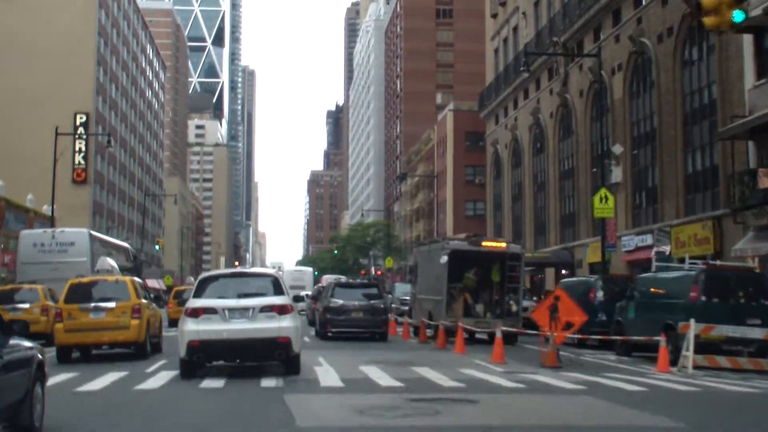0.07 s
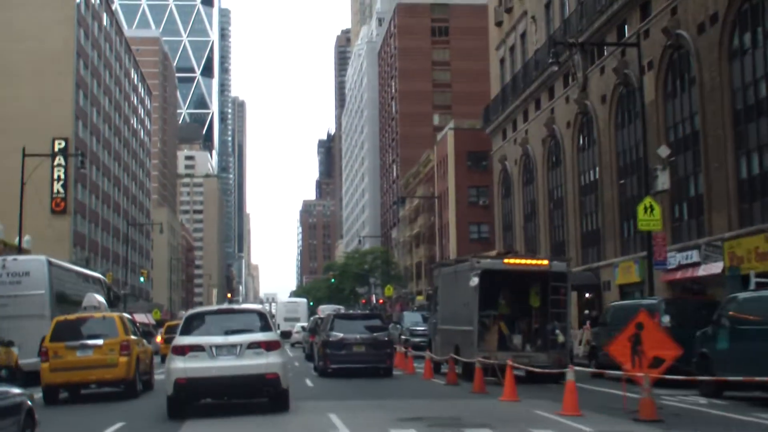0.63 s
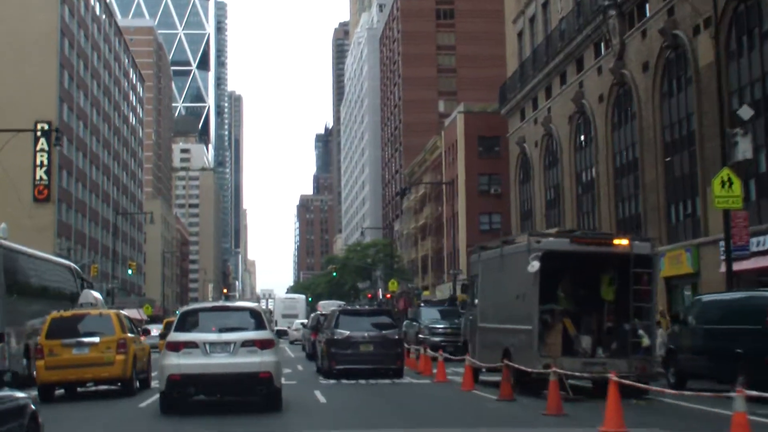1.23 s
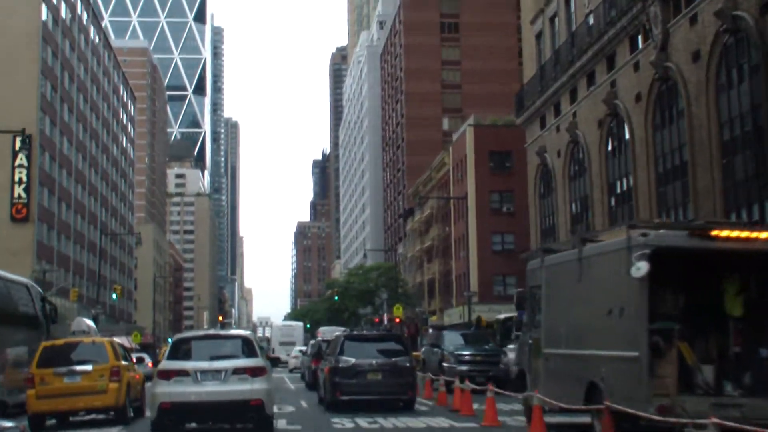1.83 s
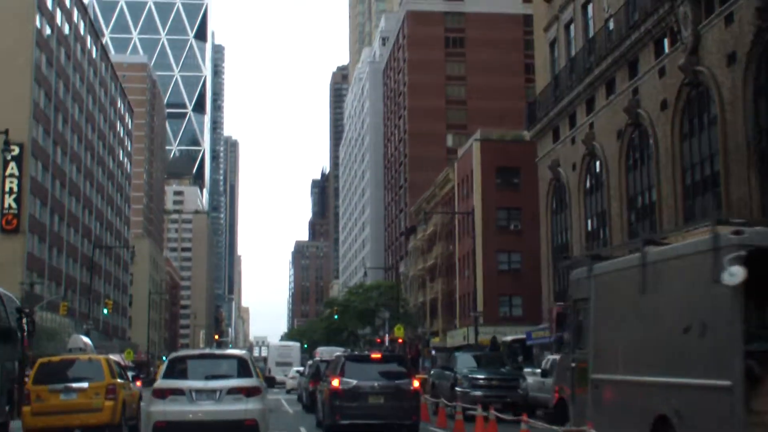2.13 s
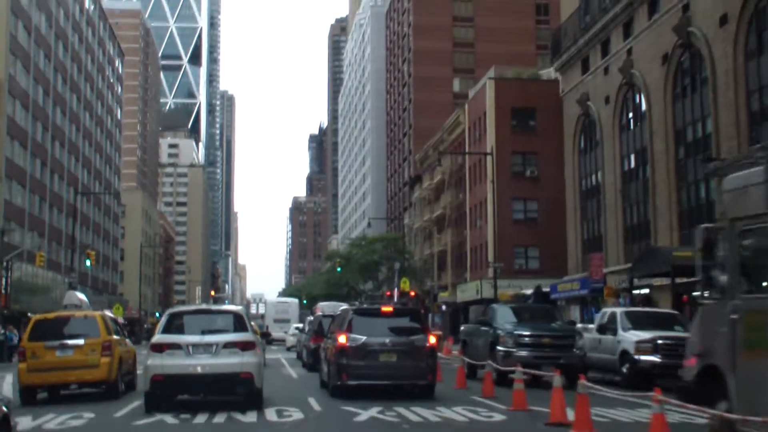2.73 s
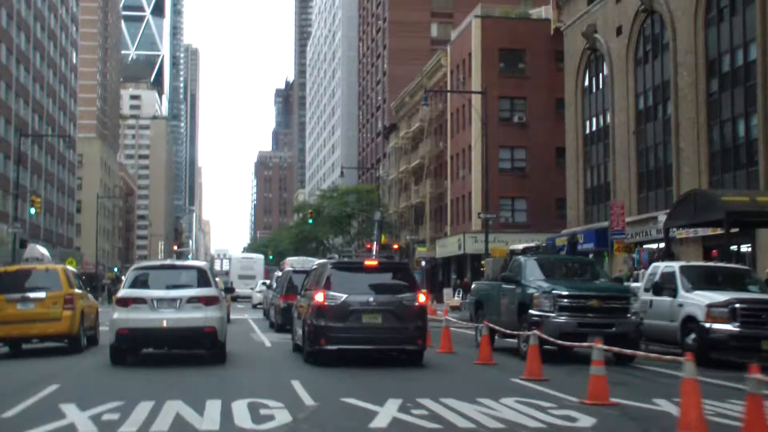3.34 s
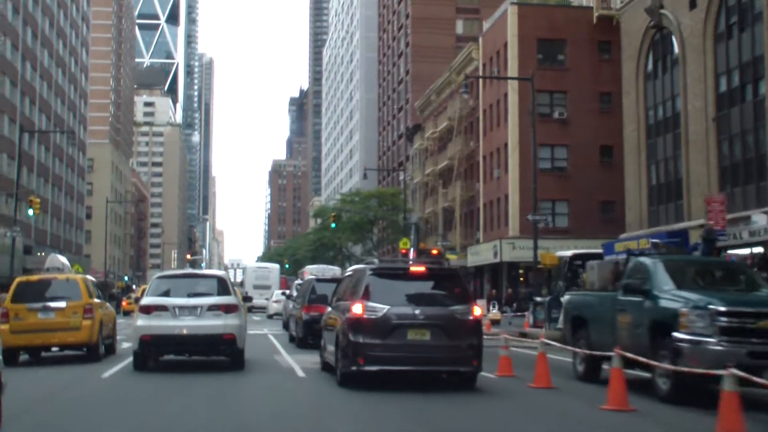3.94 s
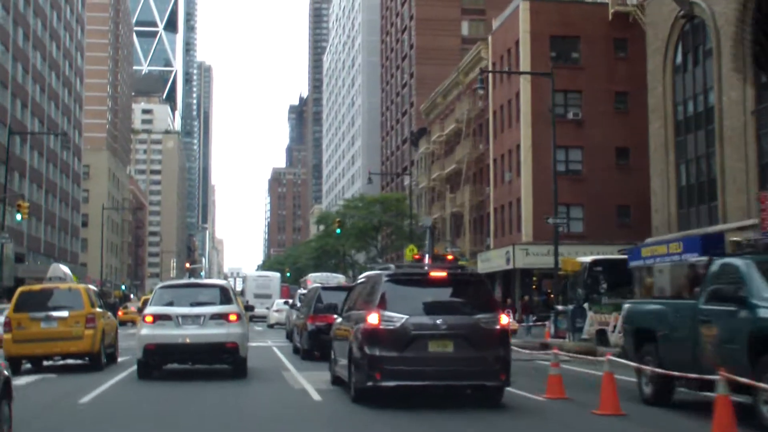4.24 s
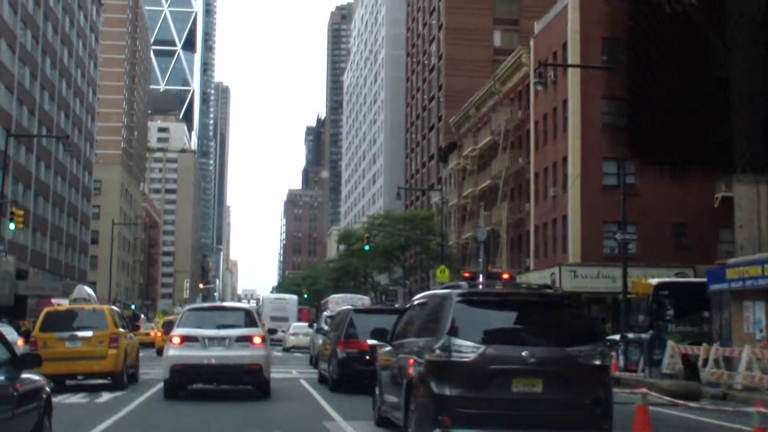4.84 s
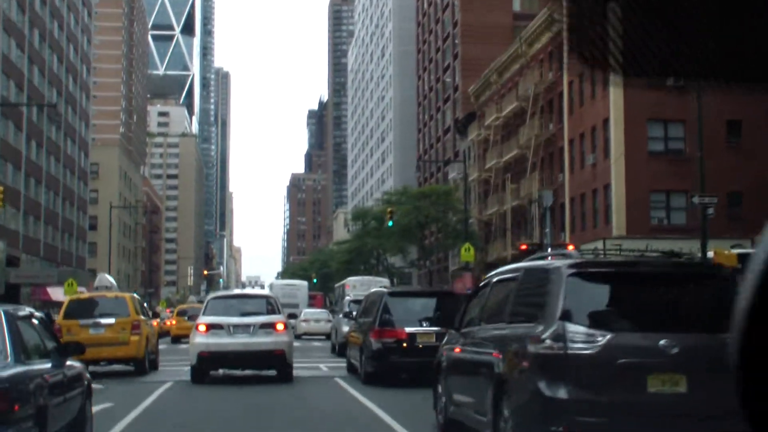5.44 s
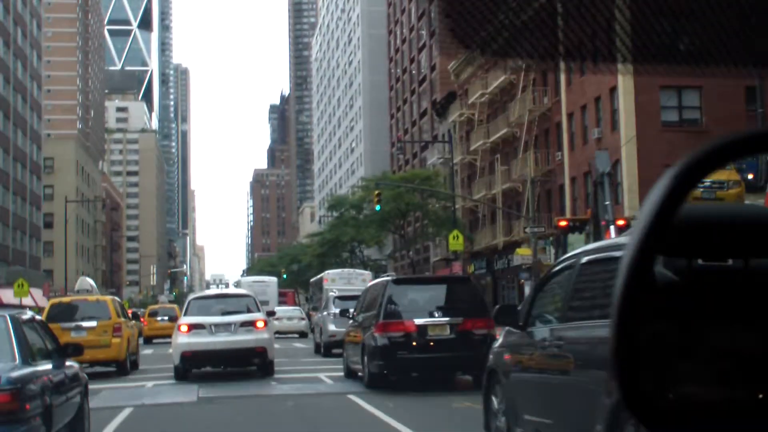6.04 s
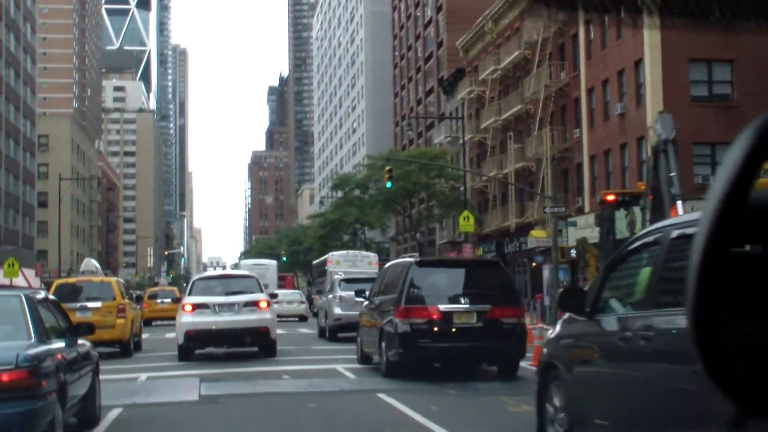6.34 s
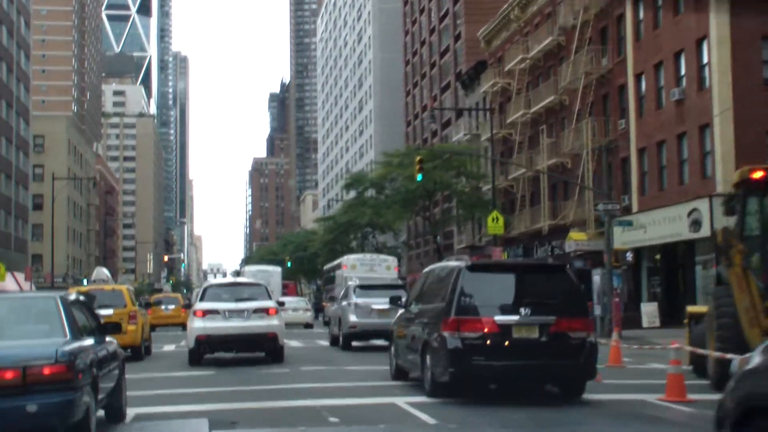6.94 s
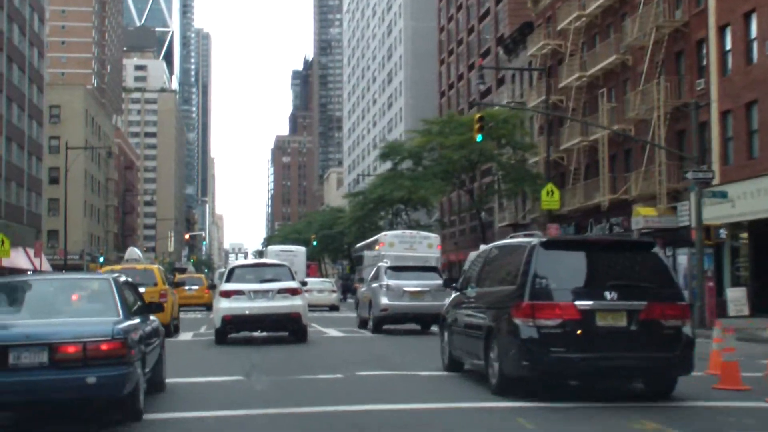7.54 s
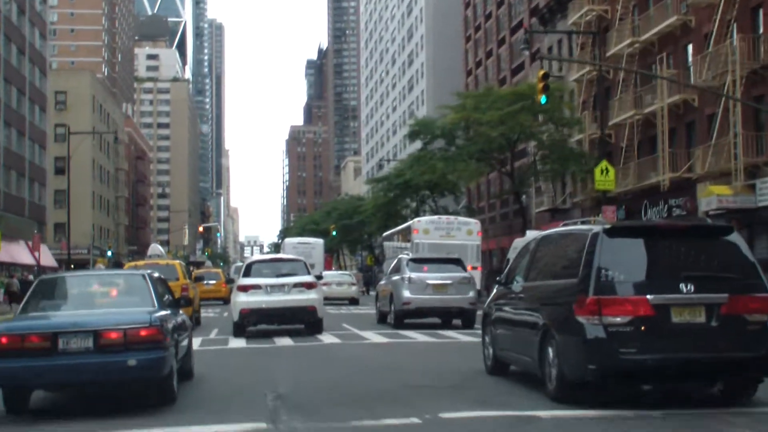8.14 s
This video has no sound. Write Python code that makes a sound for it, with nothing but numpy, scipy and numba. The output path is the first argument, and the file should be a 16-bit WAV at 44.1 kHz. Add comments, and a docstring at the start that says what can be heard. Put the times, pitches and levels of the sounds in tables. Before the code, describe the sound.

Heard from a microphone in the cabin, a car drives slowly down a city street with a heavy, surging low rumble and tyre noise. Several dull bumps and small trim clicks come in the first few seconds. Then the turn signal stalk is flicked with a quick cluster of snaps, and an even tick-tock continues over the rumble, with one brief squeak and a last double thud from the road.

```python
"""Inside a car rolling slowly along a city avenue. The body booms on its springs, the tyres roar,
trim ticks and squeaks, and road seams thud through the suspension. A hand brushes the steering
wheel and snaps the indicator stalk over; the flasher relay then goes tick-tock.
The camera's limiter rides the heavy bass, and the tallest peaks clip."""
import sys
import numpy as np
from scipy import signal
from scipy.fft import rfft, irfft, next_fast_len
from scipy.io import wavfile
from scipy.ndimage import uniform_filter1d, map_coordinates
from numba import njit

SR = 44100
rng = np.random.default_rng(int(sys.argv[2]) if len(sys.argv) > 2 else 0)


def inscribe(sig):
    """Save sig as 16-bit PCM at rate SR to the path in sys.argv[1].

    A 1-D sig is mono; a 2-D sig holds one channel per row.
    Samples are clipped to [-1, 1] before scaling.
    """
    pcm = np.round(np.clip(np.atleast_2d(sig).T, -1, 1) * 32767)
    wavfile.write(sys.argv[1], SR, pcm.astype(np.int16))


N = 360738
BLOW_S = np.arange(SR // 3) / SR  # time axis of one blow

# Level curves. Each row: time in seconds, level in dB.
BOOM_LEVEL = [(0, -11), (3.2, -10.5), (3.65, -18.5), (8.18, -15.5)]  # between surges
ROAD_ROUGHNESS = [(0.0, -25.5), (0.34, -22.5), (0.52, -23), (0.73, -19.5), (0.93, -20.5), (1.21, -29),
                  (1.59, -27.5), (2.05, -34), (2.62, -31), (3.8, -25.5), (4.31, -26), (5.01, -24.5),
                  (5.69, -25.5), (6.61, -26.5), (7.22, -24), (8.18, -25.5)]  # how hard the asphalt drives the tyres
AIR_HISS_LEVEL = [(0, -47.5), (.45, -51.5), (1.05, -49), (1.9, -53), (2.9, -53.5), (3.45, -48), (3.8, -51),
                  (5, -47.5), (8.18, -46)]

# Swells. Each row: start in seconds, length in seconds, level in dB.
BOOM_SURGES = [(0.04, .29, -2), (1.08, 0.053, -3), (1.56, .25, -6.5), (2.05, 0.12, 0), (2.37, .06, 1),
               (2.5, .36, -4), (3.06, .14, -5), (3.46, 0.055, -5), (4.0, 0.707, -8.5), (5.14, 0.1, -9),
               (5.71, .13, -8), (6.28, 0.22, -8.5), (6.74, 0.089, -8), (7.79, 0.077, -7.5),
               (8.11, 0.11, -4.5)]
FLOOR_JOLTS = [(1.07, 0.055, -9), (1.42, 0.062, -7), (1.745, 0.058, -7), (1.99, 0.058, -12.5),
               (2.62, 0.055, -8), (2.99, 0.049, -11), (3.63, 0.074, -8), (3.82, .2, -14), (7.82, .12, -8)]  # wheels crossing patches
COARSE_ASPHALT = [(0.49, 0.534, -35.5)]
HAND_STROKES = [(4.655, 0.067, -36.5), (4.82, 0.16, -43.5), (5.15, .2, -45)]

# Noise spectra. Each row: frequency in Hz, relative density in dB.
BOOM_SPECTRUM = [(12, -42), (22, -7.5), (31, -11.5), (39.5, 3.5), (43, -3.5), (50, -11), (62, -20),
                 (100, -83.5)]
RUMBLE_SPECTRUM = [(40, -96), (56, -4), (74, 5.5), (88, -4.5), (100, -4.5), (115, -1.5), (130, -5),
                   (150, -3.5), (175, -10), (260, -63.5)]
DRONE_SPECTRUM = [(110, -72), (170, 0), (200, 0.5), (235, -2), (280, -1.5), (340, -3.5), (400, -14),
                  (470, -17.5), (800, -59.5)]
ROAR_SPECTRUM = [(280, -37), (420, -2.5), (560, 3.5), (700, -2.5), (900, -3), (1100, -7.5), (1450, -12),
                 (2000, -20.5), (3200, -38.5), (8000, -64)]
HISS_SPECTRUM = [(1000, -29), (2100, 2), (3100, 5), (4200, 2.5), (5300, -0.5), (6500, -4.5), (9000, -5),
                 (15000, -15)]
THUD_SPECTRUM = [(60, -36), (180, -3.5), (400, 5), (700, -4), (1000, -15.5), (1500, -20), (2500, -35),
                 (8000, -59)]
HAND_SPECTRUM = [(1500, -2), (4000, -6), (8200, -3.5), (11000, -6), (15000, -20)]
SNAP_SPECTRUM = [(500, -0.5), (1400, -4), (2900, -6), (4200, -6), (6000, -9.5), (8300, -8.5),
                 (11000, -16.5), (15000, -20)]
RELAY_SPECTRUM = [(1500, -7.5), (2400, -5.5), (3700, -1), (6000, -2), (7000, -7.5), (8000, -8), (9000, -14),
                  (12000, -12.5), (15000, -22)]

# Loose trim. Each row: start in seconds, level in dB, centre in Hz, T60 in seconds.
TRIM_TICKS = [(.845, -34, 11000, 0.044), (0.846, -34.5, 4940, 0.052), (1.169, -29.5, 1460, 0.045),
              (1.317, -29.5, 3400, 0.045), (1.314, -24, 8460, .03), (1.543, -32, 8000, .03),
              (2.185, -32, 6900, 0.024), (3.291, -35, 6700, 0.07), (3.344, -36, 9500, 0.028),
              (3.431, -30, 8700, 0.018), (3.562, -39, 7500, .03), (4.054, -39, 9000, 0.018),
              (4.648, -30, 12000, .05), (4.661, -36, 7500, 0.024), (6.923, -32.5, 3370, 0.032),
              (7.932, -47, 6500, .02)]
# Wheels over seams. Each row: start in seconds, level in dB, T60 in seconds.
SEAM_THUDS = [(1.465, -20.5, 0.17), (1.713, -14, 0.12), (2.03, -23, 0.23), (2.646, -14, 0.11),
              (7.965, -15.5, 0.28), (8.006, -16, 0.25)]
# Trim rubbing. Each row: start in seconds, length in seconds, level in dB, pitch in Hz.
TRIM_SQUEAKS = [(1.6, 0.16, -54, 2611), (1.6, 0.16, -60, 3575), (6.144, 0.029, -30.5, 1167)]
# Stalk contacts. Each row: start in seconds, snap level in dB, relative knock level in dB.
STALK_CONTACTS = [(4.682, -22, -48), (4.942, -22, -3), (4.961, -14, -24), (4.971, -14, -13),
                  (4.987, -12, -5), (4.995, -19, -7.5)]
# Relay pulling in. Each row: start in seconds, relative level in dB, low note level in dB.
RELAY_TICKS = [(5.145, -21.5, -11), (5.825, -18.5, -9.5), (6.503, -19, -9.5), (7.184, -18, -10.5),
               (7.863, -23, -14)]
# Relay letting go. Each row: start in seconds, relative level in dB.
RELAY_TOCKS = [(5.429, -23.5), (6.106, -22.5), (6.787, -24.5), (7.480, -22), (8.148, -22)]

# Modes. Each row: frequency in Hz, relative level in dB, T60 in seconds.
PANEL_MODES = [(890, -1, 0.11), (929, -1, 0.11), (1104, -12, 0.095)]
COLUMN_MODES = [(477, -3.5, 0.041), (667, 4, 0.034), (1246, -16.5, 0.046), (1442, -20, 0.074),
                (1790, -27, 0.057), (2060, -27, 0.057), (2910, -22, 0.049)]  # steering column's plastic shell
PULL_IN_MODES = [(2650, 1, 0.027), (2935, -21.5, 0.068), (3390, -12, .05), (3830, -13, 0.048),
                 (4850, -16.5, 0.035), (5410, -16, 0.036), (6020, -23, 0.067), (6680, -19, 0.037),
                 (12950, -26, .03)]
LET_GO_MODES = [(2790, -11.5, 0.053), (3464, -5.5, 0.036), (3920, 2, 0.032), (4840, -14, 0.034),
                (5960, -11.5, .06), (7650, 1, 0.021), (8150, -6.5, 0.026), (11300, -18, .05)]

# Cabin reflections. Each row: frequency in Hz, T60 in seconds.
CABIN_DECAY = [(200, 0.09), (3000, 0.09), (12000, 0.064)]
# Stereo likeness. Each row: frequency in Hz, left-right correlation.
CORRELATION = [(60, .995), (300, .985), (640, .96), (1400, .88), (3100, .62), (6800, .33), (15000, .15)]
# Stereo balance. Each row: frequency in Hz, left minus right in dB.
BALANCE = [(100, 2.8), (200, 1.5), (400, .4), (1500, -.3), (5000, 1.2)]
# Camera's presence lift and dull top. Each row: frequency in Hz, gain in dB.
CAMERA_EQ = [(2000, 0.5), (4200, 1), (8000, -2.5), (14000, -3)]


def amp(db):
    """Decibels to gain."""
    return 10 ** (np.asarray(db) / 20)


def unit_rms(x):
    """Scale to rms 1."""
    return x / np.sqrt(np.mean(x ** 2) + 1e-20)


def at_hz(rows, hz):
    """Interpolate (Hz, value) rows on a log axis."""
    knots_hz, values = np.transpose(rows)
    return np.interp(np.log(hz + 1), np.log(knots_hz + 1), values)


def curve(rows):
    """Interpolate (seconds, value) rows at every sample."""
    return np.interp(np.arange(N) / SR, *np.transpose(rows))


def filtered(x, response):
    """Apply a gain given as a function of Hz."""
    n = x.shape[-1]
    padded = next_fast_len(n + 8192)
    return irfft(rfft(x, padded) * response(np.fft.rfftfreq(padded, 1 / SR)), padded)[..., :n]


def noise(spectrum, size=N):
    """Coloured stereo noise, rms 1: alike in the bass, diffuse in the treble."""
    def mid_side_gain(hz):
        angle = np.arccos(np.clip(at_hz(CORRELATION, hz), -1, 1)) / 2
        return amp(at_hz(spectrum, hz)) * np.array([np.cos(angle), np.sin(angle)])
    mid, side = filtered(rng.standard_normal((2, size)), mid_side_gain)
    return unit_rms(np.array([mid + side, mid - side]))


def steady_noise(spectrum, span_s):
    """Noise whose strength is evened out over stretches longer than span_s."""
    x = noise(spectrum)
    power = uniform_filter1d(np.mean(x ** 2, axis=0), int(span_s * SR))
    return unit_rms(x / np.sqrt(np.abs(power) + 1e-6))


def wobble(knots_per_s):
    """Smooth random curve."""
    knots = rng.standard_normal(int(N * knots_per_s / SR) + 4)
    return map_coordinates(knots, [np.arange(N) * knots_per_s / SR])


def swells(rows, rise_s, t60_s):
    """Gain of events that rise, hold and die away, summed in power."""
    t, power = np.arange(N) / SR, np.zeros(N)
    for start_s, length_s, db in rows:
        first = np.searchsorted(t, start_s)
        age_s = t[first:] - start_s
        rise = 1 - np.exp(-age_s / rise_s)
        fall_db = 60 * np.maximum(age_s - length_s, 0) / t60_s
        power[first:] += (rise * amp(db - fall_db)) ** 2
    return np.sqrt(power)


def envelope(t60_s, rise_s):
    """Rise and decay of one blow."""
    return amp(-60 * BLOW_S / t60_s) * (1 - np.exp(-BLOW_S / rise_s))


def burst(spectrum, t60_s, rise_s):
    """Decaying noise of one blow."""
    return envelope(t60_s, rise_s) * noise(spectrum, len(BLOW_S))


def ring(modes, rise_s, scatter_db=1.2):
    """Damped modes, struck at slightly new strengths each time."""
    out = np.zeros(len(BLOW_S))
    for hz, db, t60_s in modes:
        gain = amp(db + scatter_db * rng.normal()) * envelope(t60_s, rise_s)
        out += gain * np.sin(2 * np.pi * (hz * BLOW_S + rng.random()))
    return out


def add(track, start_s, sound):
    """Mix one blow into the track."""
    part = track[:, round(start_s * SR):][:, :len(BLOW_S)]
    part += sound[..., :part.shape[1]]


def body_boom():
    """The body's lowest resonance booms steadily and surges on each wave in the road."""
    surges = swells(BOOM_SURGES, rise_s=0.048, t60_s=0.25)
    return np.hypot(amp(curve(BOOM_LEVEL)), surges) * steady_noise(BOOM_SPECTRUM, span_s=0.12)


def road_noise():
    """Rougher asphalt raises floor-pan rumble, drone and tyre roar together; jolts shake the pan."""
    rough_db = curve(ROAD_ROUGHNESS) + 25  # 0 on usual asphalt
    jolts = swells(FLOOR_JOLTS, rise_s=0.018, t60_s=0.11)
    coarse = swells(COARSE_ASPHALT, rise_s=0.063, t60_s=0.61)
    rumble_gain = np.hypot(amp(-16 + 0.3 * rough_db), jolts)
    drone_gain = np.hypot(amp(-22 + 0.73 * rough_db), amp(-15) * jolts)
    roar_gain = np.hypot(amp(-34 + 0.55 * rough_db), coarse)
    rumble = rumble_gain * steady_noise(RUMBLE_SPECTRUM, span_s=0.21)
    drone = drone_gain * steady_noise(DRONE_SPECTRUM, span_s=0.14)
    grain_db = 1.16 * wobble(knots_per_s=22)  # the asphalt's grain changes under the tyres
    roar = roar_gain * amp(grain_db) * noise(ROAR_SPECTRUM)
    return rumble + drone + roar


def air_hiss():
    """Air hiss leaks into the cabin."""
    return amp(curve(AIR_HISS_LEVEL)) * noise(HISS_SPECTRUM)


def trim_ticks():
    """Small plastic parts tick, each in its own band."""
    out = np.zeros((2, N))
    for start_s, db, hz, t60_s in TRIM_TICKS:
        band = [(hz / 4, -45), (hz / 1.4, -13), (hz, 0), (hz * 1.56, -13), (hz * 3, -40)]
        add(out, start_s, amp(db) * burst(band, t60_s, rise_s=0.0012))
    return out


def seam_thuds():
    """Each seam in the asphalt sends a dull thud through the suspension."""
    out = np.zeros((2, N))
    for start_s, db, t60_s in SEAM_THUDS:
        add(out, start_s, amp(db) * burst(THUD_SPECTRUM, t60_s, rise_s=0.00089))
    return out


def trim_squeaks():
    """Trim rubs on trim at an unsteady pitch."""
    out = np.zeros(N)
    for start_s, length_s, db, hz in TRIM_SQUEAKS:
        pitch_hz = hz * (1 + 0.0121 * wobble(knots_per_s=140))
        gain = swells([(start_s, length_s, db)], rise_s=0.006, t60_s=0.025)
        out += gain * np.sin(2 * np.pi * np.cumsum(pitch_hz) / SR)
    return out


def panel_knock():
    """A jolt knocks a hollow panel."""
    out = np.zeros((2, N))
    add(out, start_s=2.646, sound=amp(-24) * ring(PANEL_MODES, rise_s=0.002))
    return out


def hand_brush():
    """The hand slides unevenly over the wheel to the stalk."""
    strokes = swells(HAND_STROKES, rise_s=0.0063, t60_s=0.16)
    flutter_db = 2.2 * wobble(knots_per_s=170)
    return strokes * amp(flutter_db) * noise(HAND_SPECTRUM)


def indicator_stalk():
    """The stalk snaps over its detent and knocks the hollow column."""
    out = np.zeros((2, N))
    for start_s, snap_db, knock_db in STALK_CONTACTS:
        snap = amp(snap_db) * burst(SNAP_SPECTRUM, t60_s=0.058, rise_s=0.001)
        knock = amp(knock_db + 4) * ring(COLUMN_MODES, rise_s=0.0028)
        add(out, start_s, snap + knock)
    return out


def cabin(x, wet_db):
    """Glass and dashboard add dense, very short reflections, different on each side."""
    hz, t, bins = signal.stft(rng.standard_normal((2, len(BLOW_S))), SR, nperseg=128)
    decay = amp(-60 * t / at_hz(CABIN_DECAY, hz)[:, None])
    _, tail = signal.istft(bins * decay, SR, nperseg=128)
    echo = signal.fftconvolve(np.atleast_2d(x), tail / np.linalg.norm(tail[0]), axes=1)
    return x + amp(wet_db) * echo[:, :len(BLOW_S)]


def flasher_relay(note_hz=580):
    """The armature chatters and rings; just after each stroke the dashboard gives a soft low note."""
    out = np.zeros((2, N))
    note = envelope(t60_s=0.1, rise_s=0.0024) * np.sin(2 * np.pi * note_hz * BLOW_S)
    for start_s, db, note_db in RELAY_TICKS:
        chatter = amp(1) * burst(RELAY_SPECTRUM, t60_s=0.049, rise_s=0.0036)
        ringing = cabin(amp(9) * ring(PULL_IN_MODES, rise_s=0.0033), wet_db=-8.5)
        add(out, start_s, amp(db) * (chatter + ringing))
        add(out, start_s + 0.015, amp(note_db) * note)
    for start_s, db in RELAY_TOCKS:
        chatter = amp(-1) * burst(RELAY_SPECTRUM, t60_s=0.079, rise_s=0.0032)
        ringing = cabin(amp(2.5) * ring(LET_GO_MODES, rise_s=0.003), wet_db=-2.5)
        add(out, start_s, amp(db) * (chatter + ringing))
        add(out, start_s + 0.00394, amp(db + 3.5) * note)
    return out


def scene():
    """Everything in the cabin; the bass is stronger on the left."""
    mix = body_boom() + road_noise() + air_hiss()
    mix += trim_ticks() + seam_thuds() + trim_squeaks() + panel_knock()
    mix += hand_brush() + indicator_stalk() + flasher_relay()
    return filtered(mix, lambda hz: amp(np.outer([0.5, -0.5], at_hz(BALANCE, hz))))


@njit
def ride_gain_db(over_db, down_db, up_db):
    """Step down while the peak is over the ceiling, else back up towards 0 dB."""
    gain_db = np.zeros(len(over_db))
    for i in range(1, len(over_db)):
        step_db = -down_db if over_db[i] + gain_db[i - 1] > 0 else up_db
        gain_db[i] = min(gain_db[i - 1] + step_db, 0.0)
    return gain_db


def limiter(x, ceiling_db=-0.63, attack_db_per_step=0.58, release_db_per_s=26, steps_per_s=1500):
    """Heavy bass ducks everything; the small gain steps buzz faintly on the tallest swings."""
    block = np.arange(N) * steps_per_s // SR
    block_starts = np.flatnonzero(np.diff(block, prepend=-1))
    peaks = np.maximum.reduceat(np.abs(x).max(axis=0), block_starts)
    over_db = 20 * np.log10(peaks + 1e-9) - ceiling_db
    gain_db = ride_gain_db(over_db, attack_db_per_step, release_db_per_s / steps_per_s)
    return x * amp(gain_db[block])


def record(dry):
    """Limiter, clipping at full scale, then the camera's colour and band limit."""
    clipped = np.clip(limiter(dry), -1, 1)
    return filtered(clipped, lambda hz: amp(at_hz(CAMERA_EQ, hz)) * (hz < 15050))


dry = scene()
out = record(dry)
inscribe(out)
```